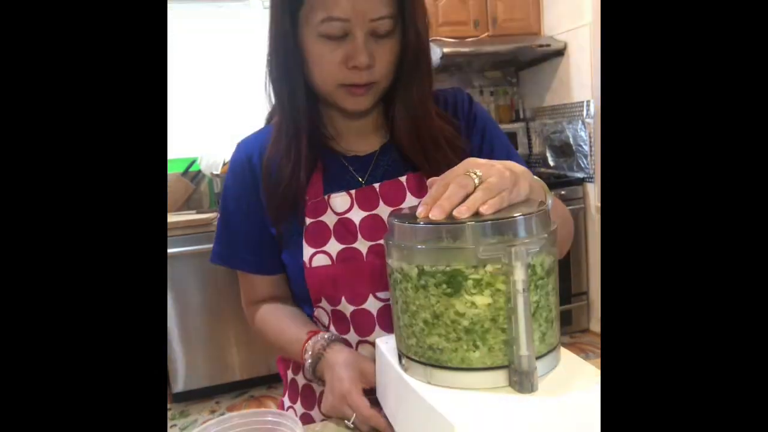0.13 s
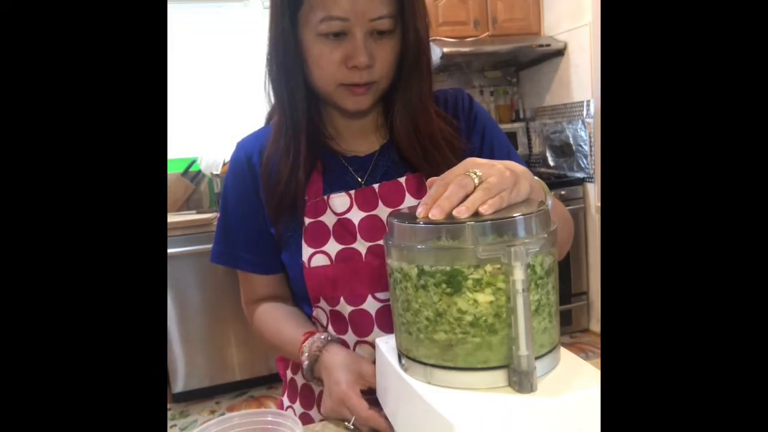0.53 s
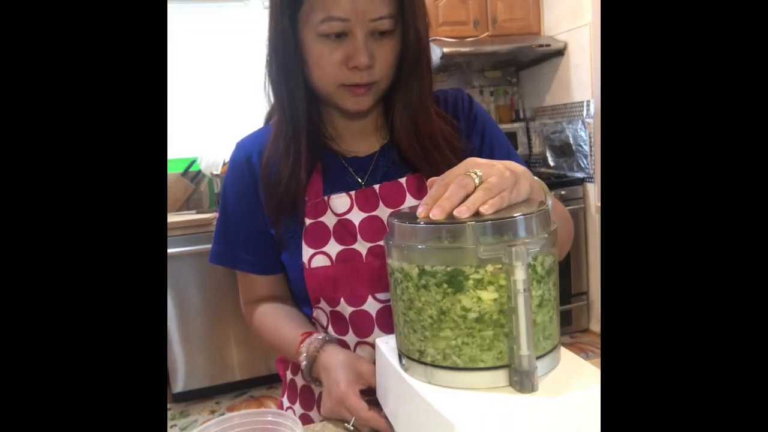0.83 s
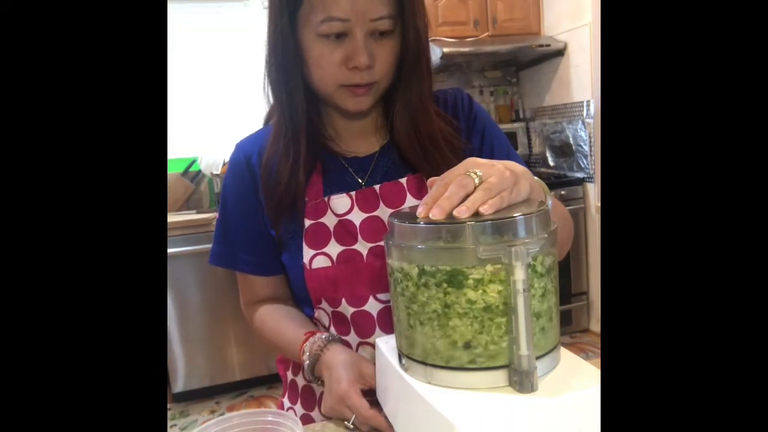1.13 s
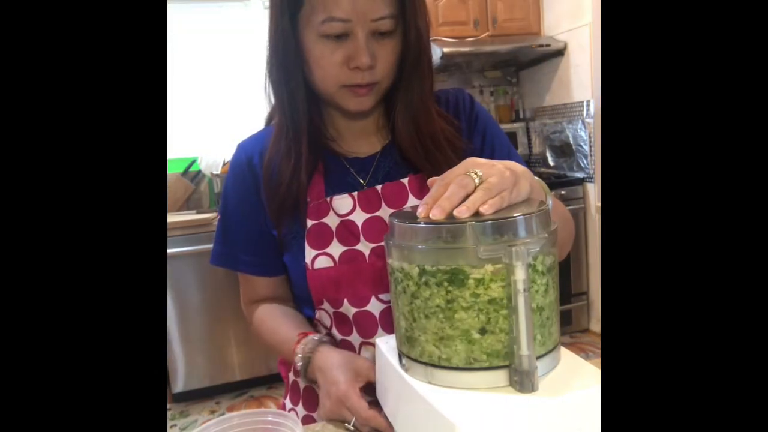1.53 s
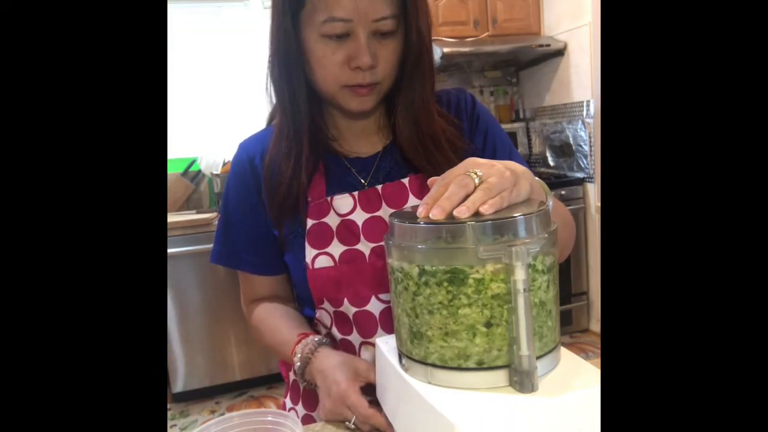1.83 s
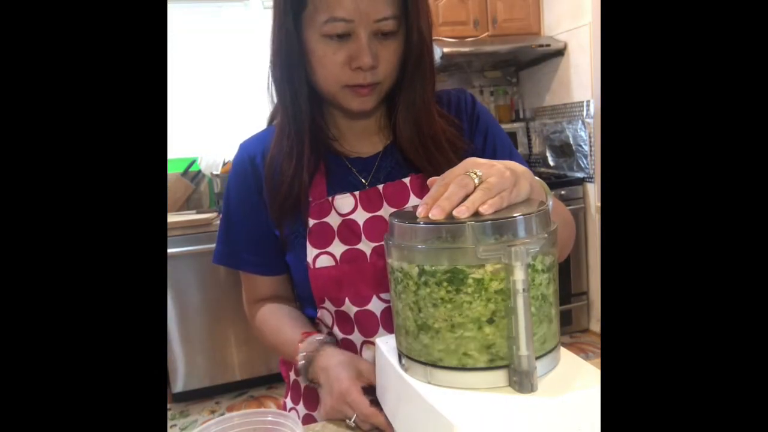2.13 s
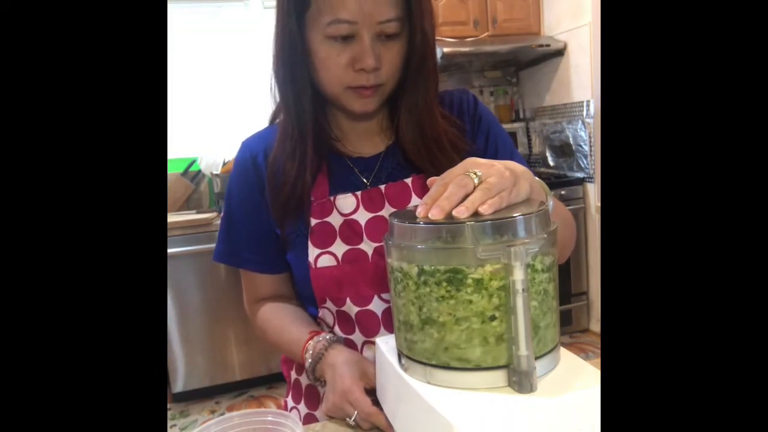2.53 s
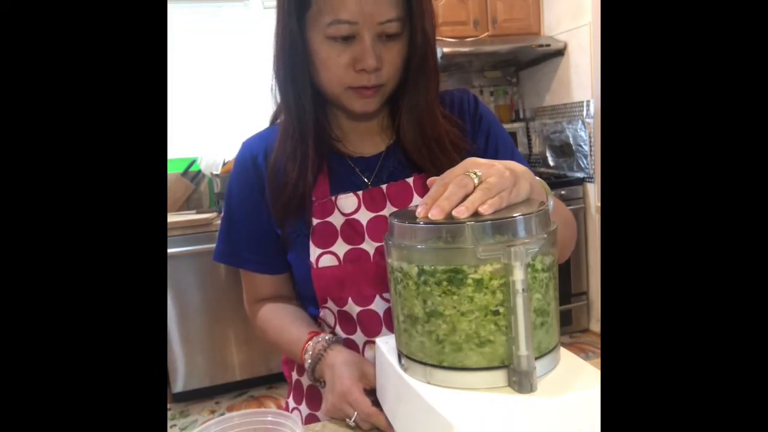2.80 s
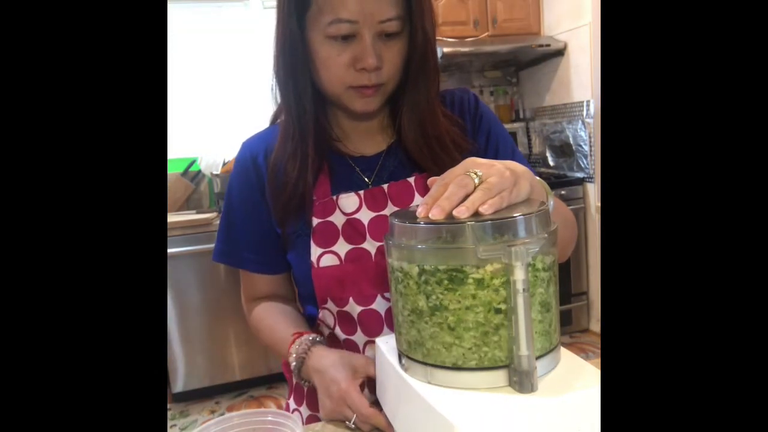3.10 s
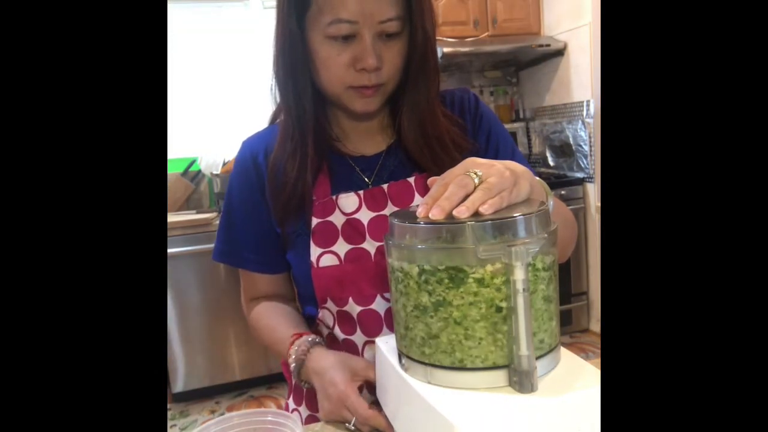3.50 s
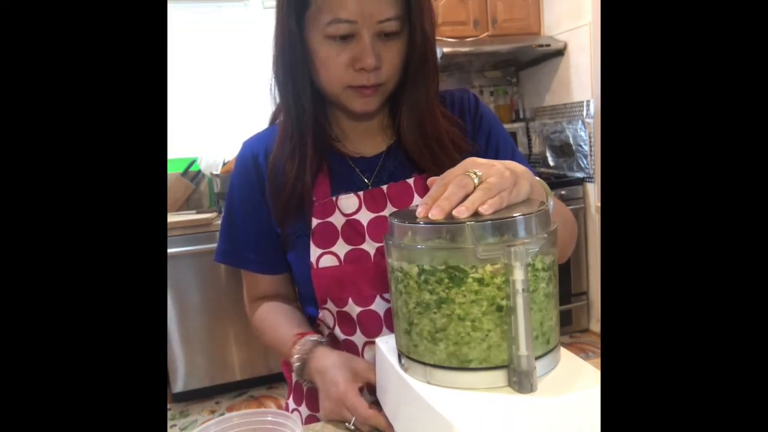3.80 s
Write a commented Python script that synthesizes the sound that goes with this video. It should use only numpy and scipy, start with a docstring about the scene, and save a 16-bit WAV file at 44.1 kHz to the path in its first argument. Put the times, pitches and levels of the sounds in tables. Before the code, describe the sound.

Close in a hard-walled kitchen, a food processor is pulsed repeatedly: tap and click, motor growl, gritty chopping, quick braking jolt. Two pulses last longer, and hard chunks crack in the plastic bowl midway.

```python
"""Food processor pulsed in a kitchen

A dying spin, then eight motor pulses chop vegetables in a plastic bowl; a last lever press closes the scene.
Shaft harmonics and shaped noise make the motor, with knocks and growl at each start and a jolt at each stop.
Grainy noise is the churn of the pieces; twice, groups of hard chunks crack and excite damped bowl modes.
Lever and switch are short noise bursts. Decaying noise gives the reverberation over a steady background."""
import sys
import numpy as np
from scipy import signal
from scipy.fft import rfft, irfft, next_fast_len
from scipy.io import wavfile
from scipy.ndimage import map_coordinates

SR = 44100
rng = np.random.default_rng(int(sys.argv[2]) if len(sys.argv) > 2 else 0)


def unload_wav(signal):
    """Save mono or channel-first audio to the path in sys.argv[1] as 16-bit WAV at rate SR, clipped to [-1, 1]."""
    wavfile.write(
        sys.argv[1],
        SR,
        np.round(np.clip(np.atleast_2d(signal).T, -1, 1) * 32767).astype(np.int16),
    )


N = 174195  # samples


def amp(db):
    """Decibel law: amplitude ratio of a level in dB."""
    return 10 ** (np.asarray(db) / 20)


def unit(x):
    """Normalisation to an rms of 1."""
    return x / np.sqrt(np.mean(x ** 2) + 1e-20)


def along(points, hz):
    """Interpolation of (f/Hz, value) points on a logarithmic frequency axis."""
    f, value = np.transpose(points)
    return np.interp(np.log(hz + 1), np.log(f + 1), value)


def since(start):
    """Elapsed time: seconds since start, zero before it."""
    return np.maximum(np.arange(N) / SR - start, 0)


def wobble(rate):
    """Slow random modulation: a smooth curve through rate random knots a second."""
    knots = rng.standard_normal(int(N * rate / SR) + 4)
    return map_coordinates(knots, [np.arange(N) * rate / SR])


def filtered(x, response):
    """Linear filtering: the spectrum of x times a response of frequency."""
    m = next_fast_len(N + SR // 2)
    hz = np.fft.rfftfreq(m, 1 / SR)
    return irfft(rfft(x, m) * response(hz), m)[:N]


def noise(spectrum, grain=1):
    """Source-filter principle: white noise weighted by grain, then coloured, with rms 1."""
    excitation = grain * rng.standard_normal(N)
    return unit(filtered(excitation, lambda hz: amp(along(spectrum, hz))))


def bursts(rows, attack, t60):
    """Exponential decay: a fast rise and a 60 dB fall in t60 seconds for each (t/s, level/dB) row."""
    out, t = np.zeros(N + SR), np.arange(SR // 2) / SR
    shape = amp(-60 * t / t60) * (1 - np.exp(-t / attack))
    for start, db in rows:
        out[round(start * SR):][:len(t)] += amp(db) * shape
    return out[:N]


def ring(rows, modes, attack, scatter_db):
    """Modal synthesis: each (t/s, level/dB) blow excites damped modes, a little differently each time."""
    out, t = np.zeros(N + SR), np.arange(SR // 10) / SR
    for start, blow_db in rows:
        tone = 0
        for hz, db, t60 in modes:
            decay = amp(db + scatter_db * rng.normal() - 60 * t / t60)
            detuned_hz = hz * (1 + .015 * rng.normal())
            tone = tone + decay * np.sin(2 * np.pi * detuned_hz * t)
        out[round(start * SR):][:len(t)] += amp(blow_db) * tone * (1 - np.exp(-t / attack))
    return out[:N]


# motor pulses; the first is just dying away: on t/s, off t/s
PULSES = [(-.3, -.025), (.122, .298), (.488, .643), (.870, 1.439), (1.625, 1.785), (1.948, 2.175),
          (2.393, 3.064), (3.276, 3.441), (3.622, 3.784)]
SPIN_UP_S, BRAKE_S = .058, .018  # time to reach full speed, time constant of stopping


def drive():
    """Rotational inertia: linear run-up and exponential braking; relative speed and starting current."""
    speed, inrush = 0, 0
    for on, off in PULSES:
        run_up = np.minimum(since(on) / SPIN_UP_S, 1)
        speed = speed + run_up * np.exp(-since(off) / BRAKE_S)
        inrush = inrush + (1 - np.exp(-since(on) / .028)) / (1 + (since(on) / .1) ** 8)
    return speed, inrush


BUZZ_HZ = 120  # twice the mains frequency


def buzz(depth):
    """Torque ripple: the torque pulsates at twice the mains frequency."""
    return np.exp(depth * np.cos(2 * np.pi * BUZZ_HZ * since(0)))


SHAFT_HZ = 29.85  # nominal full speed, turns a second
# audible harmonics of the shaft rotation: multiple, relative level/dB
SHAFT_ORDERS = [(4, -16), (5, -10), (8, -11.5), (12, -10.5), (13, -6)]
# noise spectra of running rumble, starting growl, stopping jolt and run-out rattle: f/Hz, relative level/dB
MOTOR = [(21, -54), (40, -22), (90, -11), (160, -8), (230, -4.5), (384, -1), (490, -13), (540, -12),
         (605, -23), (700, -21), (1200, -85)]
GROWL = [(30, -28), (56, 3), (100, 0), (280, 3), (640, -7), (820, 0), (1100, -6), (1500, -5), (4000, -18),
         (9000, -32)]
JOLT = [(25, -32), (52, 3), (95, 3), (200, -2), (440, -5), (540, 0), (700, -14), (1000, -8), (9000, -55)]
COAST = [(30, -27), (55, 0), (300, 8), (680, -3), (1000, 3), (1500, -4), (4000, -6), (5000, -14),
         (10000, -28)]


def motor(speed, inrush):
    """Order tracking: shaft tones follow the speed; growl at starts, jolt and rattle at stops."""
    turns = np.cumsum(SHAFT_HZ * speed * (1 + .006 * wobble(8))) / SR
    tones = 0
    for multiple, db in SHAFT_ORDERS:
        level = amp(db + 1.8 * wobble(12))
        tones = tones + level * np.sin(2 * np.pi * (multiple * turns + rng.random()))
    running = amp(-39.5) * tones * speed + amp(-36) * noise(MOTOR) * speed ** .7
    growl = amp(-33.8) * inrush * noise(GROWL, buzz(depth=.4) * amp(1.5 * wobble(200)))
    stops = [(max(off - .008, 0), 0) for on, off in PULSES]
    # the first stop precedes the scene: only its rattle is heard
    jolt = amp(-26.5) * noise(JOLT) * bursts(stops[1:], attack=.01, t60=.13)
    coast = amp(-39.3) * noise(COAST, amp(4 * wobble(110))) * bursts(stops, attack=.005, t60=.5)
    return running + growl + jolt + coast


# the blade strikes hard chunks: t/s, relative level/dB
CHUNKS = [(1.646, -16), (1.667, -3.5), (1.681, -15), (1.952, -13), (1.974, -10.5), (1.991, -9),
          (2.004, -13)]
# noise spectra of churned pieces and cracking chunks: f/Hz, relative level/dB
CHURN = [(350, -52), (600, -22), (778, -7), (880, -8), (1040, -4), (1240, -6), (1610, -4.5), (1770, -1),
         (2000, -1), (2630, -4), (2860, -2), (3060, -7), (3970, -8), (5070, -14.5), (5360, -18.5),
         (7440, -22.3), (10300, -32), (14200, -30), (15800, -35)]
CRACK = [(80, -7), (360, -1), (700, -14), (1550, -16), (1950, 2), (2500, 0), (3000, -6), (5100, -11),
         (8000, -18), (11000, -34)]
# nominal modes of the plastic bowl: f/Hz, relative level/dB, t60/s
BOWL = [(350, -18, .06), (775, -30, .08), (1990, -2, .012), (2170, 0, .011), (2450, -5, .011),
        (3260, -12, .011)]


def chopping(speed):
    """Superposed impacts: small pieces spatter as noise; hard chunks crack, ring the bowl and crumble."""
    spatter = amp(1.5 * wobble(900) + 1.3 * wobble(150)) * buzz(depth=.08)
    churn = amp(-30.4) * noise(CHURN, spatter) * speed ** 2.2
    bites = [(strike - .002, db) for strike, db in CHUNKS]  # cracking leads the ringing
    cracks = amp(-6) * noise(CRACK) * bursts(bites, attack=.003, t60=.021)
    crumbs = amp(-22) * noise(CRACK) * bursts(bites, attack=.002, t60=.14)
    bowl = amp(7.3) * ring(CHUNKS, BOWL, attack=.002, scatter_db=1)
    return churn + cracks + crumbs + bowl


# the drive takes up its slack: t/s, relative level/dB
KNOCKS = [(.1213, -16.5), (.488, -18), (.5105, -22), (.870, -18.5), (.888, -21.5), (1.625, -16.5),
          (1.947, -20), (2.392, -18), (3.276, -18), (3.294, -22), (3.313, -22), (3.622, -20)]
# nominal modes of the drive: f/Hz, relative level/dB, t60/s
DRIVE = [(380, -12, .04), (900, -9, .022), (1280, 0, .013), (1700, -4, .012), (2600, -8, .012)]
# noise spectrum of a dull tap, also heard in the lever: f/Hz, relative level/dB
TAP = [(100, -13), (550, -6), (1300, -7), (2700, 0), (4300, -2), (6000, -10), (10000, -19)]
NUDGE_LEAD_S, NUDGE_DB = .0105, -30  # the hub stirs before each start; level relative as in KNOCKS


def coupling():
    """Impact excitation: the hub nudges the shaft, then knocks on it and shakes the base at each start."""
    nudges = [(on - NUDGE_LEAD_S, NUDGE_DB) for on, off in PULSES[1:]]
    blows = KNOCKS + nudges
    rattle = amp(-11) * noise(TAP) * bursts(blows, attack=.0012, t60=.03)
    thump = amp(-9) * noise(MOTOR) * bursts(blows, attack=.002, t60=.05)
    return rattle + thump + amp(5) * ring(blows, DRIVE, attack=.002, scatter_db=1.5)


# the lever is pressed, a dull tap: t/s
TAPS = [0.0622, 0.4125, 0.7945, 1.5622, 1.8795, 2.3175, 3.2072, 3.5618, 3.8916]
# the switch closes, brighter clicks: t/s, relative level/dB
CLICKS = [(0.0862, -29), (0.0987, -24.5), (0.1321, -18), (0.4404, -33), (0.4614, -26), (0.8225, -30),
          (0.843, -26), (1.5848, -28), (1.5963, -29), (1.9096, -31), (1.9225, -27), (2.3456, -30),
          (2.3638, -25.5), (3.2306, -30), (3.2445, -28), (3.5843, -25.5), (3.5947, -26), (3.915, -30),
          (3.9275, -27)]
# the switch snaps open: t/s, relative level/dB
SNAPS = [(0.2887, -30), (0.6424, -29), (1.4386, -32), (1.7844, -43), (3.0639, -32), (3.4411, -29),
         (3.7833, -30)]
# noise spectra of closing click, lever scrape and opening snap: f/Hz, relative level/dB
CLICK = [(100, -15), (550, -5), (1300, -6), (2500, 1), (6000, -6), (14000, -17)]
SCRAPE = [(300, -15), (1100, 0), (4000, -1), (5500, -7), (8000, -9), (10000, -17)]
SNAP = [(500, -15), (2700, 3), (7000, -8), (10500, -11), (12200, -4), (13300, -8)]
# nominal mode of the housing: f/Hz, relative level/dB, t60/s
HOUSING = [(548, 0, .17)]


def lever():
    """Contact and friction noise: pressing taps, rubs and clicks; release scrapes, catches and snaps."""
    presses = [(start, 0) for start in TAPS]
    tap = amp(-26.5) * noise(TAP) * bursts(presses, attack=.003, t60=.028)
    housing = amp(-44.5) * ring(presses, HOUSING, attack=.003, scatter_db=2)
    rub = amp(-41) * noise(TAP, amp(5 * wobble(200))) * bursts(presses, attack=.02, t60=.3)
    click = amp(-3) * noise(CLICK) * bursts(CLICKS, attack=.0008, t60=.026)
    scrapes = [(opening - .027, 0) for opening, db in SNAPS]
    scrape = amp(-29) * noise(SCRAPE) * bursts(scrapes, attack=.004, t60=.07)
    catches = [(opening - .007, 0) for opening, db in SNAPS]
    catch = amp(-27) * noise(SCRAPE) * bursts(catches, attack=.0008, t60=.02)
    snap = amp(4) * noise(SNAP) * bursts(SNAPS, attack=.0005, t60=.018)
    return tap + housing + rub + click + scrape + catch + snap


# reverberation time of the room: f/Hz, t60/s
KITCHEN = [(100, .35), (4000, .45), (15000, .27)]


def kitchen(x):
    """Reverberation: hard walls and cupboards answer, each frequency decaying at its own rate."""
    hz, t, z = signal.stft(rng.standard_normal(SR // 2), SR, nperseg=256)
    decay = amp(-60 * t / along(KITCHEN, hz)[:, None])
    tail = signal.istft(z * decay, SR, nperseg=256)[1]
    delayed = np.pad(x, (SR // 200, 0))  # the answer starts 5 ms late
    return signal.fftconvolve(delayed, tail / np.linalg.norm(tail))[:N]


# noise spectrum of the background: f/Hz, relative level/dB
AIR = [(35, -36), (60, -6), (139, 1), (197, -15), (307, -5), (663, -25), (1610, -18), (3810, -25),
       (15800, -54)]


def background():
    """Stationary noise: a steady coloured background."""
    return amp(-52.5) * noise(AIR)


def scene():
    """Superposition: direct sound of the machine, its reverberation and the background."""
    speed, inrush = drive()
    machine = motor(speed, inrush) + chopping(speed) + coupling() + lever()
    return (machine + amp(-9) * kitchen(machine) + background())[None]


LOW_CUT_HZ, TOP_HZ = 40, 15900  # bass roll-off, upper band limit


def record(dry):
    """Band limitation: the microphone drops the deepest bass; nothing is kept above the band limit."""
    def response(hz):
        return (hz < TOP_HZ) / np.sqrt(1 + (LOW_CUT_HZ / (hz + 1)) ** 10)
    return filtered(dry[0], response)[None]


dry = scene()
out = record(dry)
unload_wav(out)
```